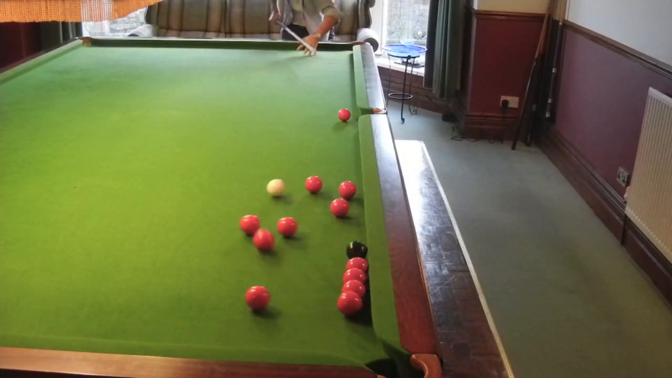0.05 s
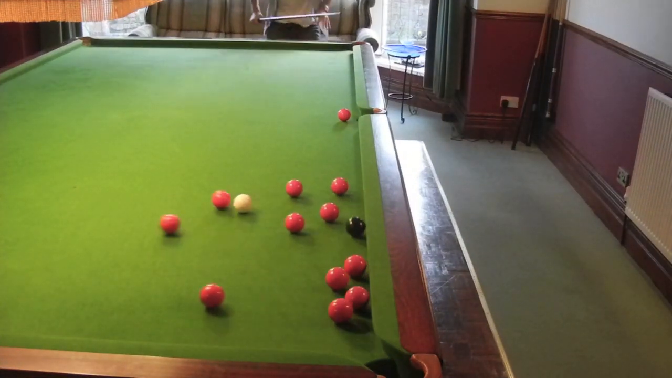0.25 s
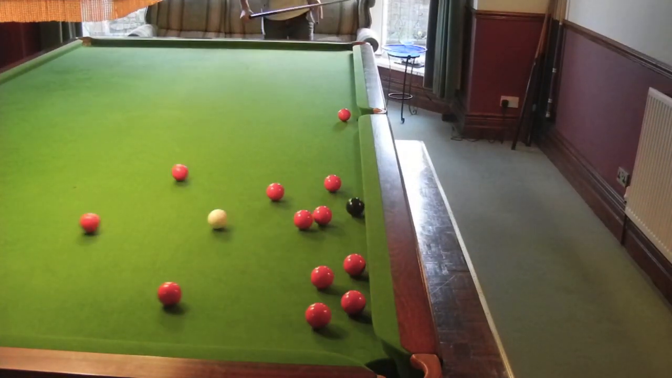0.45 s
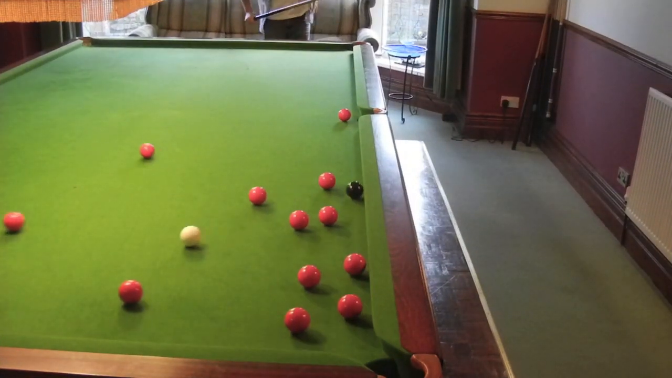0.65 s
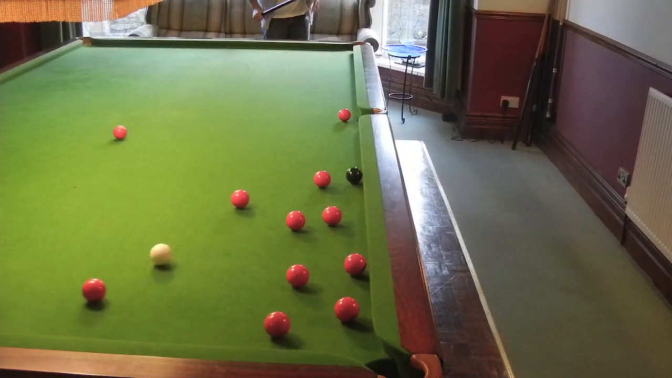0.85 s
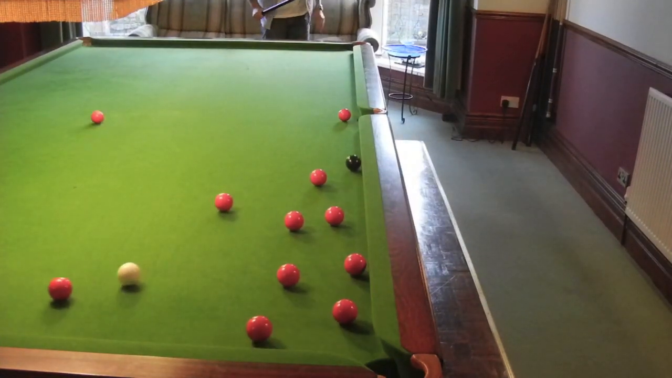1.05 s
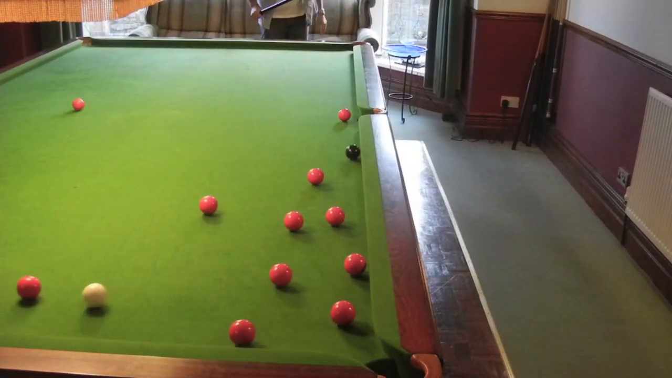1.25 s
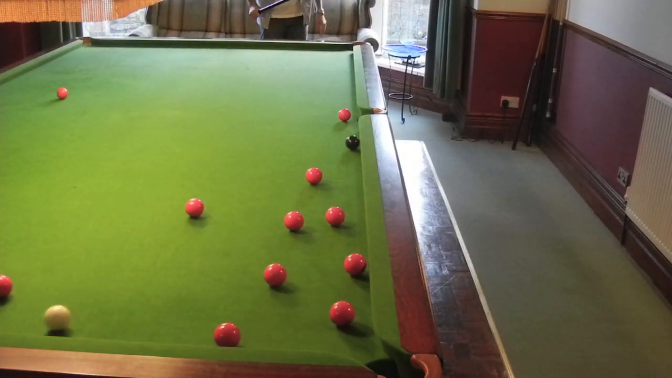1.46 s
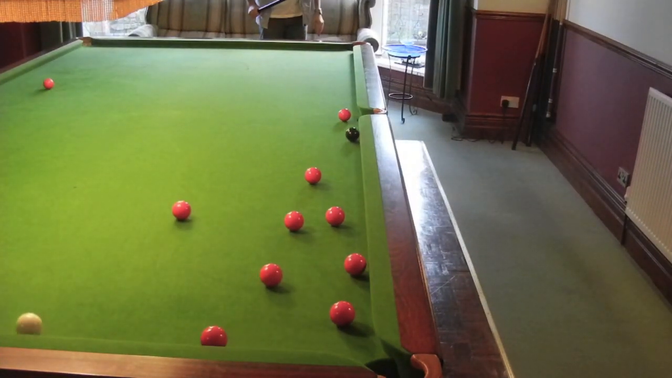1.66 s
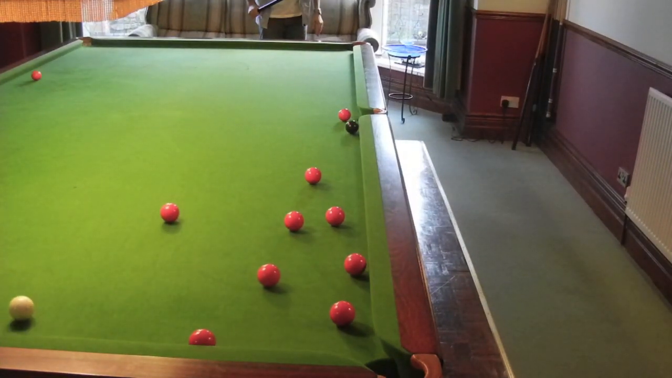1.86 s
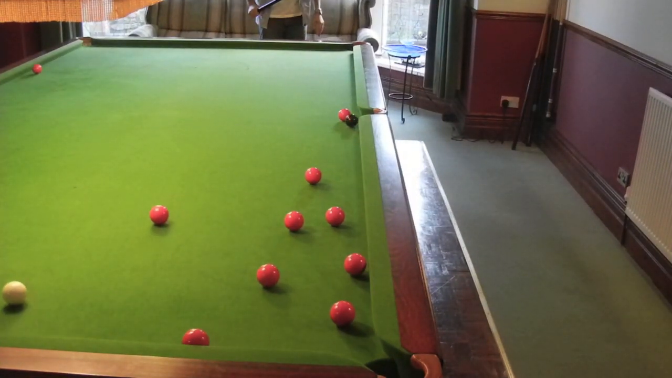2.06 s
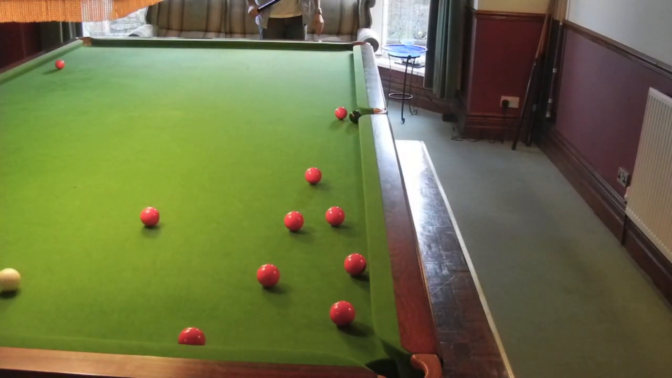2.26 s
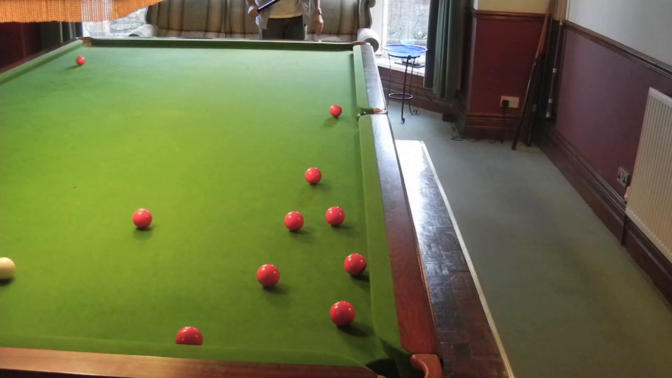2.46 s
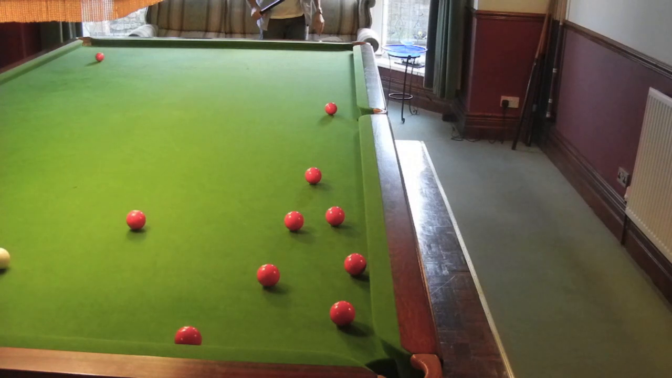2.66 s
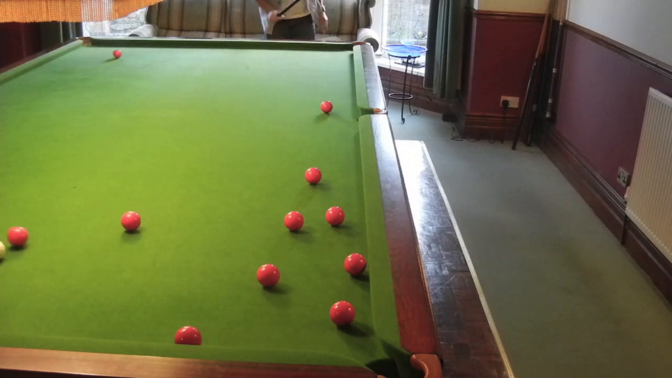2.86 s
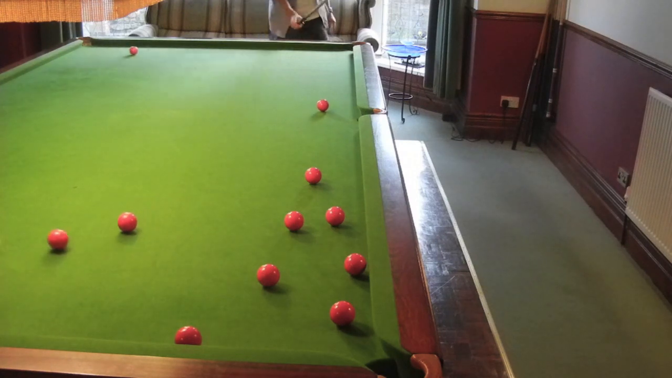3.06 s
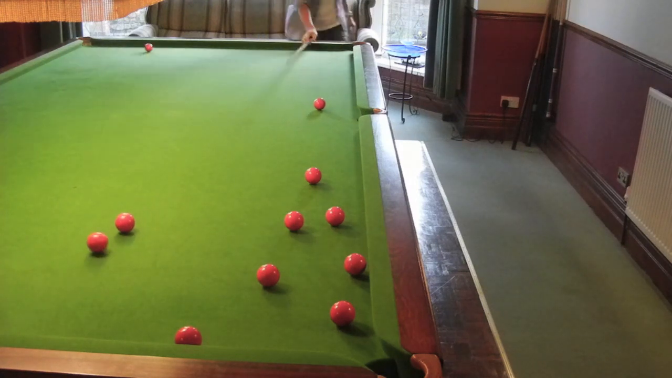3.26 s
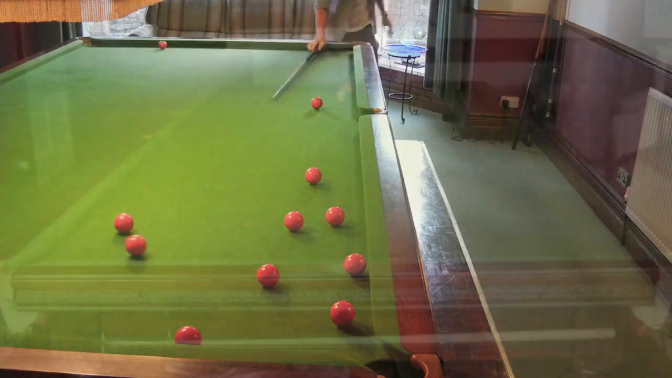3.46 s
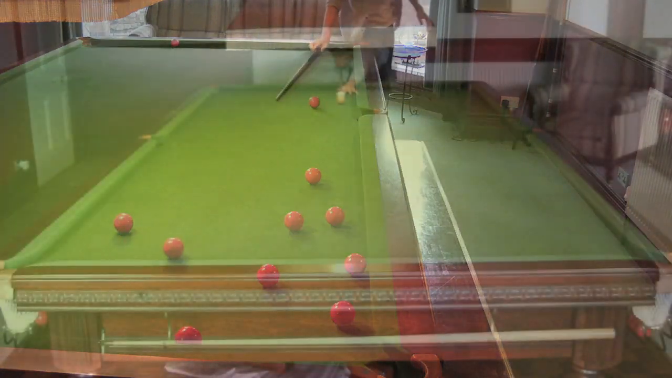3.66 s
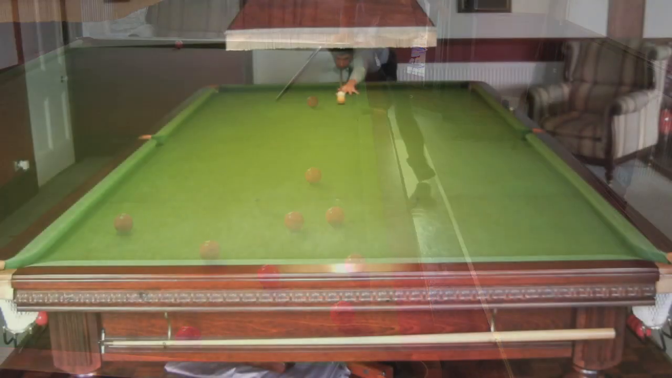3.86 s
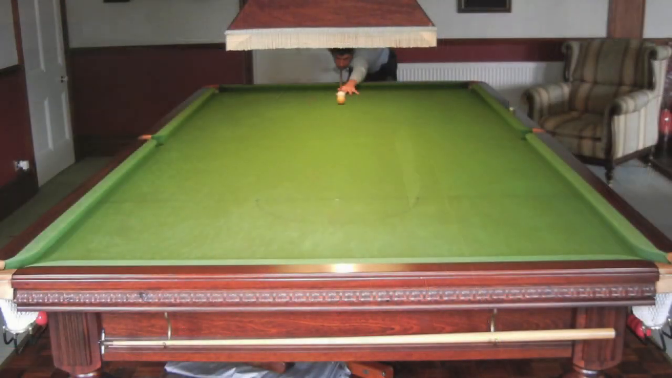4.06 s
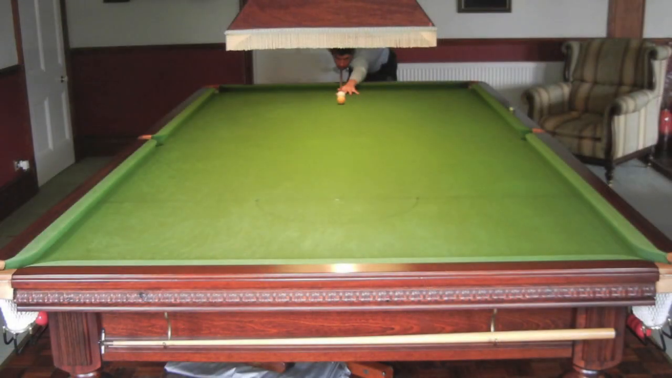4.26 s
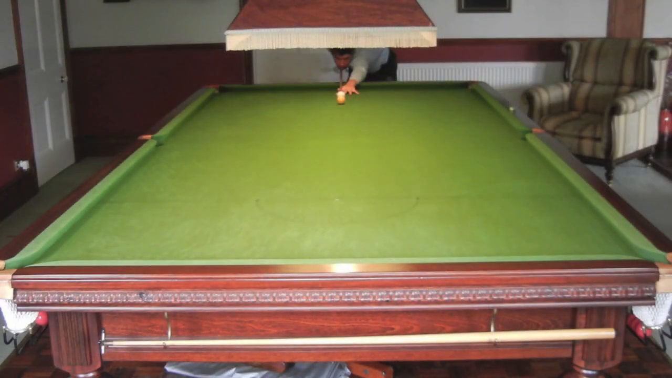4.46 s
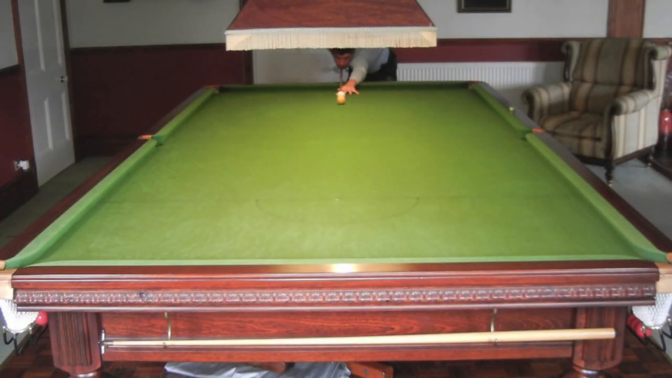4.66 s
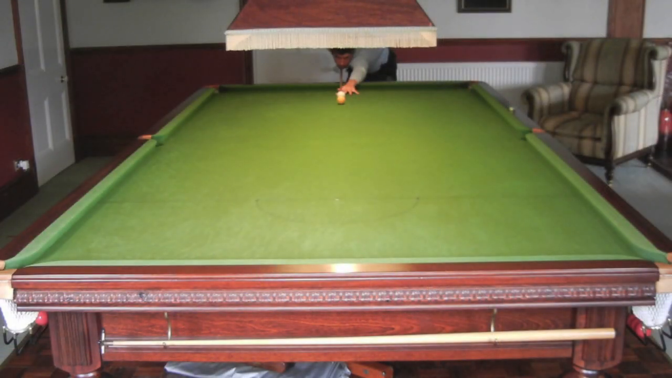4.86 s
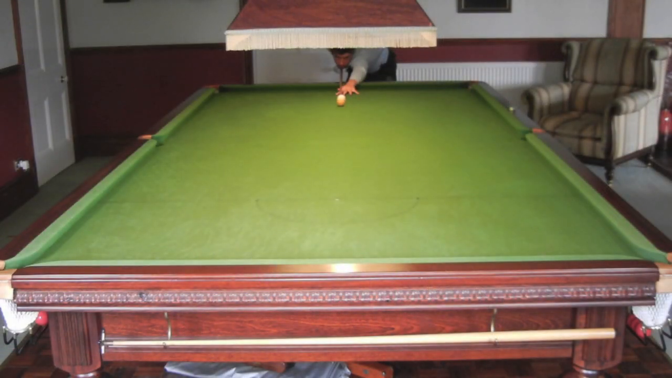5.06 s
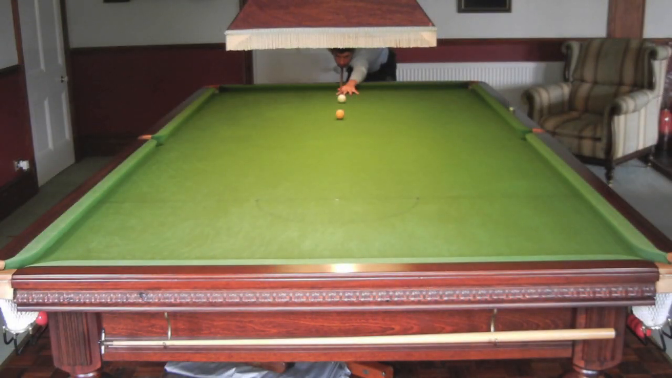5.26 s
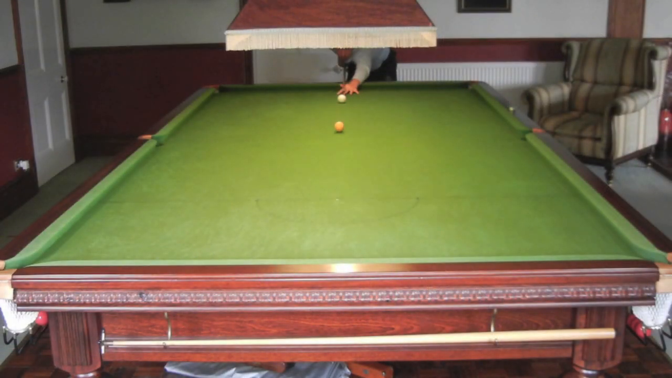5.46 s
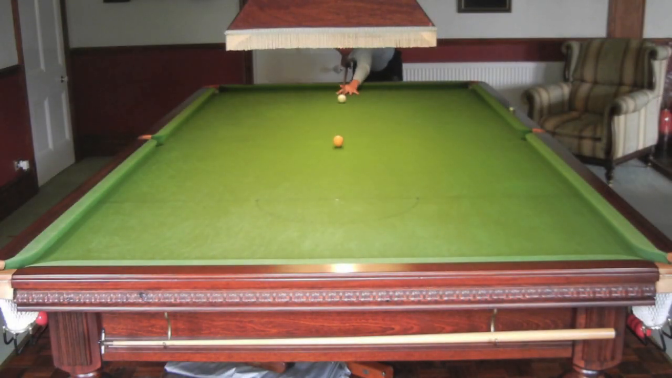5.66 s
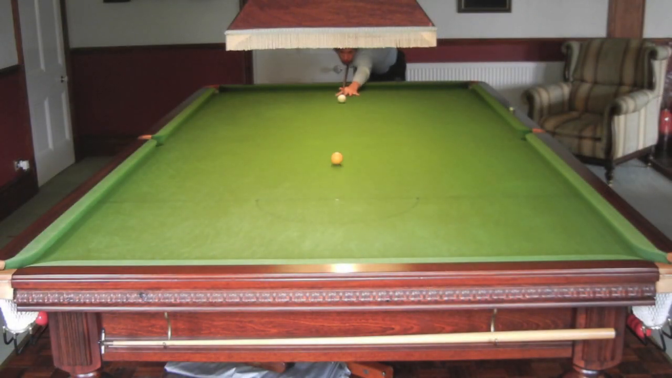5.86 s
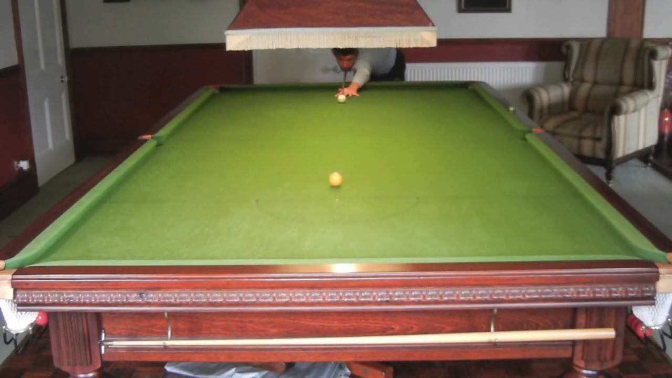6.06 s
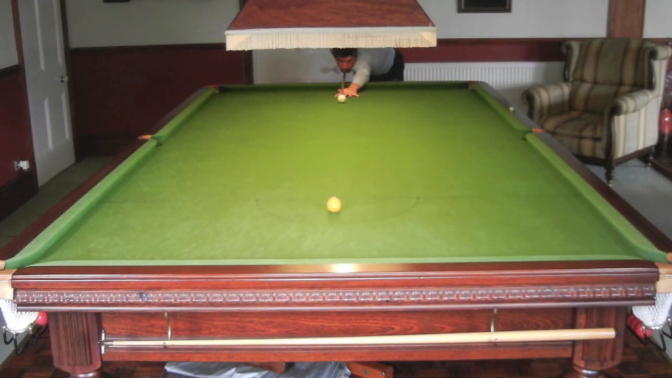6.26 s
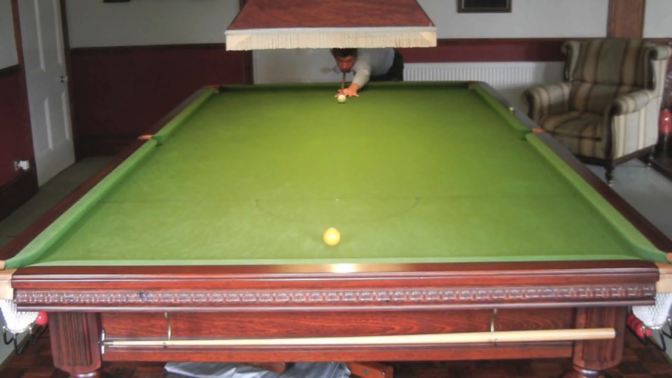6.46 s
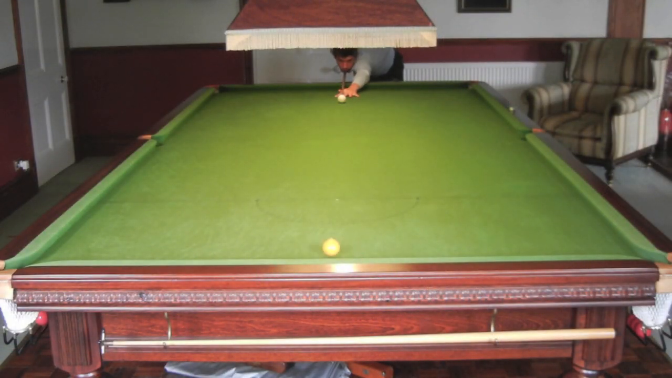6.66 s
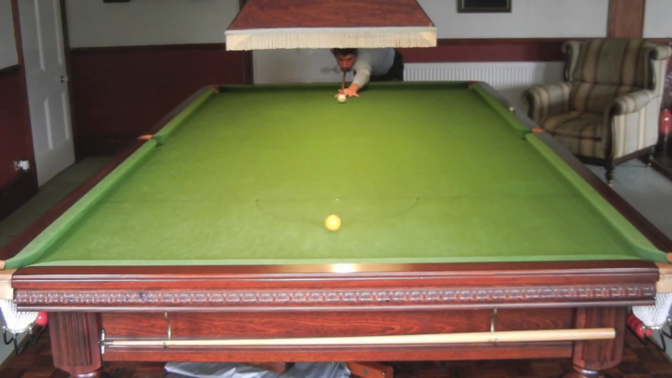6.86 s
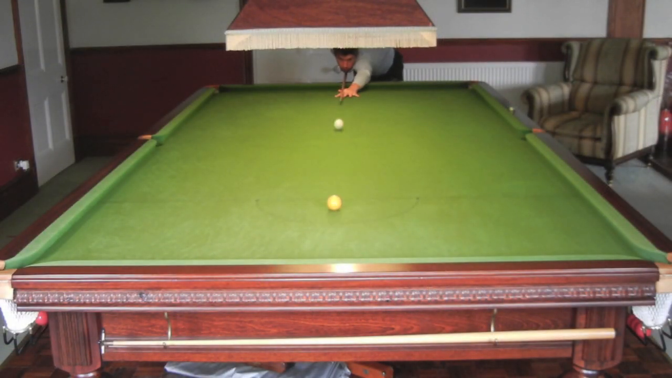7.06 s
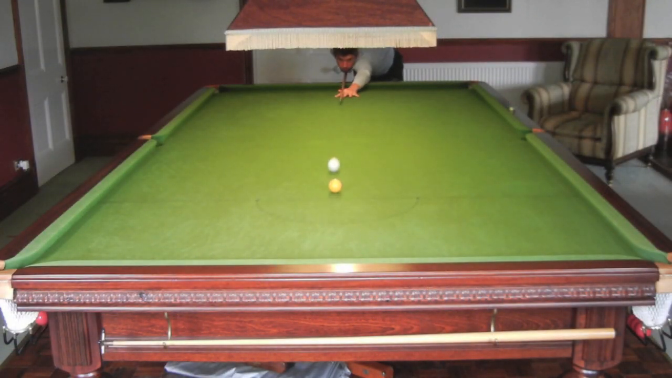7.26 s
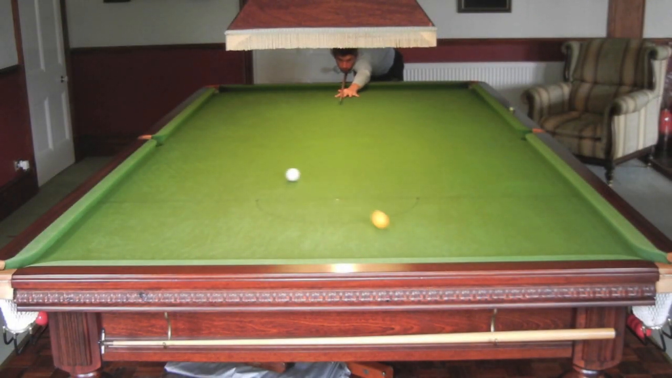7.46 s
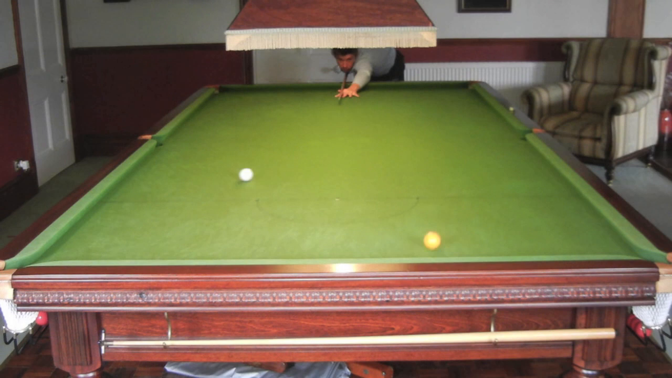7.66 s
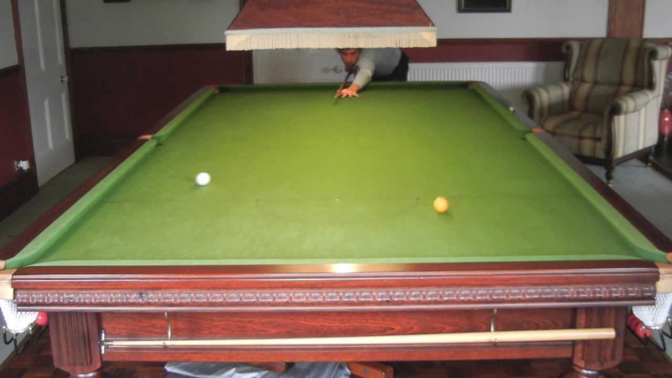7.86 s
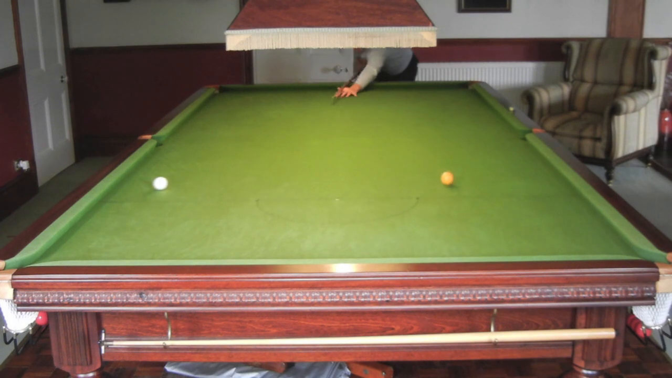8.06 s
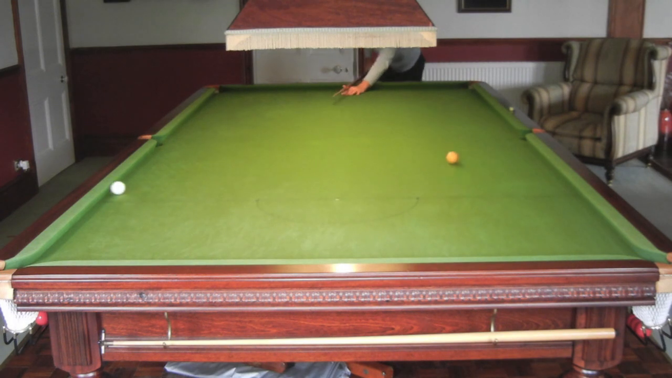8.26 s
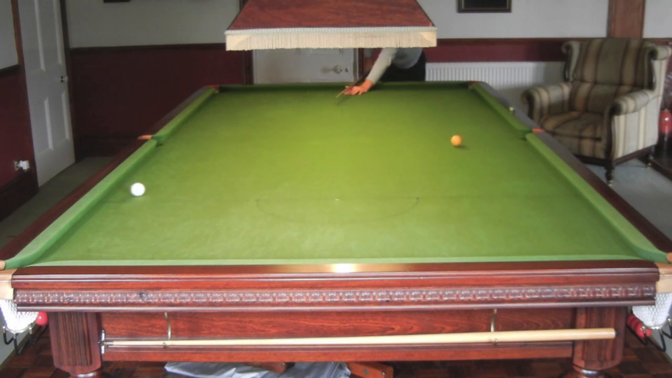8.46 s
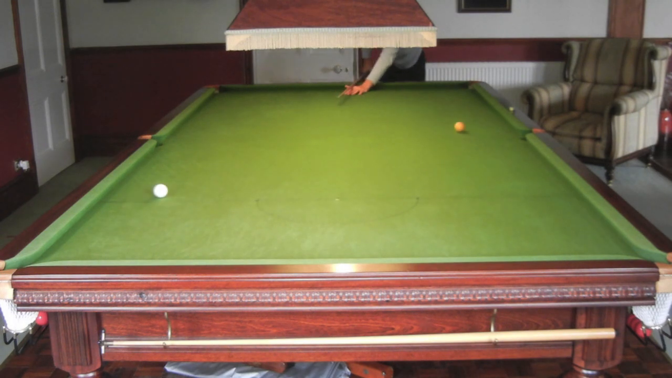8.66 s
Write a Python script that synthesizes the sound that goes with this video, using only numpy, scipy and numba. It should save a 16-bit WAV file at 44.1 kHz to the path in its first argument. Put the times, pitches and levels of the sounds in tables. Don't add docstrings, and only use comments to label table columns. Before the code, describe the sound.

A quiet, moderately live room with steady faint microphone hiss. At 0 s a snooker pack bursts open: loud, dry, high clicks tumble together until about 0.25 s, with a low cushion thud and rolling rumble beneath, then another click near 0.6 s. Balls roll softly; dull cushion bumps come at 1.6 and 2.1 s, and a clear single click at 2.3 s. Shoes scuff carpet at 2.7 and 3.0 s; a cue taps wood around 3.5 s as the first place blends into another. At 5.1 s a distant cue stroke cracks, woody and smeared by the room, with a ball click. The ball rolls quietly and bumps the cushion at 6.7 s. A harder, ringing stroke lands at 7.0 s, a loud echoing ball click at 7.4 s, cushion thuds at 7.7 s, then a muffled cue knock at 8.3 s and fading roll. The recording level dips after loud hits.

```python
import sys
import numpy as np
from scipy import signal
from scipy.fft import rfft, irfft, next_fast_len
from scipy.io import wavfile
from scipy.ndimage import uniform_filter1d
from numba import njit

SR = 44100
rng = np.random.default_rng(int(sys.argv[2]) if len(sys.argv) > 2 else 0)


def amplitude_ratio(level_db):
    exponent = np.asarray(level_db, float) / 20
    return 10 ** exponent


def dump(signal):
    limited = np.clip(np.atleast_2d(signal).T, -1, 1)
    pcm = np.round(limited * 32767).astype(np.int16)
    wavfile.write(sys.argv[1], SR, pcm)


N = 384552


def to_rms(x):
    return x / np.sqrt(np.mean(x ** 2) + 1e-20)


def to_peak(x):
    return x / np.max(np.abs(x))


def along(points, hz):
    point_hz, value = np.transpose(points)
    return np.interp(np.log(hz + 1), np.log(point_hz + 1), value)


def filtered(x, response):
    size = next_fast_len(x.shape[-1] + 4096)
    spectrum = rfft(x, size) * response(np.fft.rfftfreq(size, 1 / SR))
    return irfft(spectrum, size)[..., :x.shape[-1]]


def peaks(rows):
    def response(f):
        total = 0
        for k, (centre, width, db) in enumerate(rows):
            damping = 1j * f * width
            total = total + (-1) ** k * amplitude_ratio(db) * damping / (centre * centre - f * f + damping)
        return total
    return response


def stereo(pair, side):
    wide = filtered(pair[1], lambda hz: amplitude_ratio(along(side, hz)))
    return np.array([pair[0] + wide, pair[0] - wide])


def noise(spectrum, side):
    pair = filtered(rng.standard_normal((2, N)), lambda hz: amplitude_ratio(along(spectrum, hz)))
    return stereo(pair / np.std(pair[0]), side)


def ring(modes, t, lag):
    out = np.zeros(len(t))
    for hz, db, t60 in modes:
        wander = np.cumsum(rng.standard_normal(len(t))) * .008 + 2 * np.pi * rng.random()
        size = amplitude_ratio(db + rng.normal(0, 1.5) - 60 * t / t60)
        gather = 1 - np.exp(-t / (lag * (hz / 3000) ** 2 + 1e-4))
        out += size * gather * np.sin(2 * np.pi * hz * t + wander)
    return to_peak(out)


FADE = (3.54, 4.38)
# delay in seconds, level in dB.
EARLY = [(.0008, -3), (.0027, -3), (.0039, -5), (.0062, -7), (.0075, -9), (.015, -17)]
# frequency in Hz, decay time t60 in seconds.
ROOM = [(100, 1), (400, 0.59), (2000, 0.61), (4000, 0.57), (8000, 0.53), (15000, 0.19)]
# frequency in Hz, side over mid in dB.
WIDE = [(60, -7), (110, -20), (200, -14.5), (380, -27), (700, -11), (1290, -14.5), (2380, -16), (4400, -7),
        (8120, 3), (15000, 9)]
CURTAINED = .72
TAIL = 28000


def add(out, s, hit, room_db, echo_db, stretch=1):
    hz, t, z = signal.stft(rng.standard_normal((2, TAIL)), SR, nperseg=256)
    t60 = along(ROOM, hz)[:, None] * (CURTAINED if s < FADE[1] else 1)
    tail = signal.istft(z * amplitude_ratio(-60 * t / t60), SR, nperseg=256)[1][:, :TAIL]
    tail = tail * (1 - np.exp(-(np.arange(TAIL) / SR / 0.012) ** 2))
    answer = amplitude_ratio(room_db) * stereo(tail / np.linalg.norm(tail[0]), WIDE)
    answer[:, 0] += 1
    for delay, db in EARLY:
        echo = amplitude_ratio(db + echo_db + rng.normal(0, 1.0, 2)) * rng.choice([-1, 1])
        answer[:, round(delay * stretch * SR)] += echo
    start = round(s * SR)
    sound = signal.fftconvolve(hit[None], answer, axes=1)[:, max(-start, 0):]
    part = out[:, max(start, 0):][:, :sound.shape[1]]
    part += sound[:, :part.shape[1]]


def pulse(spectrum, size=1024):
    cepstrum = irfft(np.log(amplitude_ratio(spectrum(np.fft.rfftfreq(size, 1 / SR))) + 1e-6), size)
    fold = np.r_[1, np.full(size // 2 - 1, 2), 1, np.zeros(size // 2 - 1)]
    return to_peak(irfft(np.exp(rfft(cepstrum * fold)), size))


# frequency in Hz, level in dB per Hz.
CONTACT = [(150, -43), (300, -16.5), (600, -17.5), (1200, -7), (1800, 1), (2400, 5), (3000, 1),
           (3600, -6.5), (4200, -20), (5000, -34), (7000, -46.5), (12000, -78)]
# start in seconds, peak in dB,
# pitch factor, room in dB, echo spacing factor.
CLICKS = [(-.03, 12.5, 0.99, -20, 1.0), (0.079, 9, 1.04, -19.5, 0.92), (0.1088, -5.5, 0.956, -2, 0.92),
          (0.1452, 1, 0.93, -13, 0.9), (0.172, -6.5, 0.57, -14, 0.74), (0.186, -4.5, 0.83, -17, 0.85),
          (0.227, -6.5, 0.93, -3.5, 0.81), (0.33, -21.5, 0.9, 6, 0.88), (0.5652, -9, 0.87, -7.5, 0.7),
          (2.015, -52.5, 0.89, 16, 0.91), (2.279, -3, 0.86, -13.5, 0.91), (5.1494, 8, .95, -7, 0.52),
          (7.4369, 10, 1.015, -10.5, 1), (7.463, -3, 0.98, 5, 1)]
PACK_ENDS_S = .4
PACK_ECHO_DB, OPEN_ECHO_DB, LAMP_ECHO_DB = -4.5, -1.5, 10.5


def balls(out):
    for s, db, pitch, room_db, stretch in CLICKS:
        if s < PACK_ENDS_S:
            echo_db = PACK_ECHO_DB
        else:
            echo_db = OPEN_ECHO_DB if s < FADE[1] else LAMP_ECHO_DB
        click = pulse(lambda hz: along(CONTACT, hz / pitch))
        add(out, s, amplitude_ratio(db) * click, room_db + 12.5, echo_db, stretch)


# time in seconds, level in dB.
ROLL = [(0, -32.5), (.5, -41.5), (.9, -58), (1.2, -55), (2.5, -54), (3.2, -54.5), (3.9, -59.5), (4.3, -55),
        (4.8, -61.5), (5.5, -64), (5.7, -61), (5.85, -50.5), (6.05, -54), (6.6, -59), (7.5, -56),
        (8.1, -59), (8.4, -49), (8.72, -59)]
# frequency in Hz, level in dB per Hz.
RUMBLE = [(15, -59), (25, -28), (43, -2), (75, -2.5), (103, 0.5), (168, -9.5), (198, -5.5), (295, -17.5),
          (500, -11.5), (650, -44), (1100, -120)]
# frequency in Hz, level in dB per Hz.
CLOTH = [(180, -45), (300, -12), (492, -8), (743, -10.5), (974, -10.5), (1670, -9), (2710, -9.5),
         (5000, -34.5), (6500, -44), (11000, -120)]
# frequency in Hz, side over mid in dB.
ROLL_SIDE = [(60, -12), (110, -7), (200, -9), (380, -7), (700, -18), (1290, -5), (2380, -7.5), (4400, -14),
             (8120, -6), (15000, -2)]
# start in seconds, level in dB.
SHUDDERS = [
    (0.03, -48),
    (5.098, -44),
    (7.007, -30.5),
    (7.435, -38.5),
]
SHUDDER_T60_S = 2.24
RUMBLE_DB, RUMBLE_GROWS, ROLL_MID_DB = 1, 0.72, -53


def rolling():
    t = np.arange(N) / SR
    roll_db = np.interp(t, *np.transpose(ROLL))
    shudder = sum(amplitude_ratio(db - 60 * np.abs(t - s) / SHUDDER_T60_S) * (t > s) for s, db in SHUDDERS)
    slate = amplitude_ratio(ROLL_MID_DB + RUMBLE_DB + RUMBLE_GROWS * (roll_db - ROLL_MID_DB)) + shudder
    return slate * noise(RUMBLE, ROLL_SIDE) + amplitude_ratio(roll_db) * noise(CLOTH, ROLL_SIDE)


# frequency in Hz, level in dB per Hz.
HISS = [
    [(180, -52), (300, -5), (502, -11.5), (555, -5.5), (814, -9.5), (1010, -9.5), (1460, -13),
     (2440, -18.5), (2840, -13.5), (4670, -19), (11300, -20.5), (16000, -21.5)],
    [(180, -36), (300, -0.5), (398, -10), (519, -7), (555, -18), (603, -2.5), (787, -6.5), (1040, -6.5),
     (2400, -9), (6200, -15.5), (9880, -15), (16000, -19.5)],
]
# frequency in Hz, side over mid in dB.
HISS_SIDE = [(60, 5), (110, -6), (200, -9), (380, 4), (700, -1.5), (1290, -2), (2380, 1), (4400, -1.5),
             (8120, -2), (15000, 0.5)]


def hiss():
    later = np.interp(np.arange(N) / SR, FADE, (0, 1))
    first = amplitude_ratio(-55.5) * (1 - later) * noise(HISS[0], HISS_SIDE)
    return first + amplitude_ratio(-55.0) * later * noise(HISS[1], HISS_SIDE)


# start in seconds, peak in dB, rail over bed in dB, knock in dB, bed pitch in Hz.
THUDS = [(0.037, -20.5, 0, -0.5, 193.6), (0.64, -45, 8, -3, 165), (1.637, -35, -11, -17, 166.2),
         (1.718, -45, -3.5, -14, 158), (2.132, -38.5, -1, -30, 161), (2.727, -40, -27, -14, 158),
         (3.019, -41.5, -9, -3, 164.7), (3.345, -49, -8, -7, 144), (3.415, -43.5, 7, -12, 148),
         (3.678, -44, 3, -6, 176), (3.735, -49.5, -16, -7, 152), (3.829, -57, -16, -17.5, 163),
         (6.705, -32.5, 11, -8, 174), (6.76, -37, 9, -33, 187), (7.711, -29, 2.5, -4, 197.4),
         (7.753, -27, 9.5, -25, 209.5), (8.412, -47.5, 0, -17, 196.6), (8.541, -53, -14, -14, 196)]
# multiple of the bed pitch, width in Hz, level in dB.
BED = [(.62, 43, -10.5), (0.998, 10.1, 7), (1.22, 19, -4)]
# frequency in Hz, width in Hz, level in dB.
RAIL = [(374, 35.5, -1), (468, 76, -5.5), (554, 107, -8)]
# frequency in Hz, width in Hz, level in dB.
KNOCK = [(700, 36, 8), (1136, 710, 9), (2140, 950, 9)]


def cushions(out):
    t = np.arange(SR // 2) / SR
    push = (t / 0.00059) * np.exp(-t / 0.0009)
    for s, db, lean_db, knock_db, hz in THUDS:
        bed_db, rail_db = -max(lean_db, 0), min(lean_db, 0)
        swell = (t / .003) ** 2 / (1 + (t / 0.0046) ** 2) * np.exp(-t / 0.013)
        rough = rng.standard_normal(len(t)) * swell
        rough = to_peak(filtered(rough, lambda f: 1 / (1 + 1j * f / 2500) ** 2))
        bed_rows = [(multiple * hz, width, level) for multiple, width, level in BED]
        bed = amplitude_ratio(bed_db) * to_peak(filtered(push + 0.11 * rough, peaks(bed_rows)))
        rail = amplitude_ratio(rail_db) * to_peak(filtered(push + 0.3 * rough, peaks(RAIL)))
        knock = amplitude_ratio(knock_db) * to_peak(filtered(rough, peaks(KNOCK)))
        add(out, s - .003, amplitude_ratio(db + 0.5) * (bed + rail + knock), room_db=6.0, echo_db=6.0)


# start in seconds, peak in dB, decay time t60 in seconds.
SCUFFS = [
    (2.7266, -28.5, 0.2),
    (2.7738, -36, 0.47),
    (2.9813, -23, 0.18),
    (3.731, -34.5, 0.2),
]
# frequency in Hz, level in dB per Hz.
SOLE = [(180, -42), (300, -6.5), (571, -1.5), (1120, -10.5), (1260, -6), (2280, -5.5), (6050, -19),
        (10300, -19), (15500, -25)]


def shoes(out):
    t = np.arange(SR // 4) / SR
    for s, db, t60 in SCUFFS:
        rub = to_rms(filtered(rng.standard_normal(len(t)), lambda hz: amplitude_ratio(along(SOLE, hz))))
        envelope = amplitude_ratio(db - 11 - 60 * t / t60) * (1 - np.exp(-t / 0.001))
        add(out, s - .004, envelope * rub, room_db=-1.0, echo_db=2.5)


# start in seconds, peak in dB, brightness in dB, place 0 or 1.
TAPS = [
    (3.442, -31, -7, 0),
    (3.542, -19.5, -2, 0),
    (8.153, -33, -14, 1),
    (8.302, -21, -19, 1),
]
# frequency in Hz, level in dB, t60 in seconds.
BUTT = [
    [(411, -5.5, 0.086), (532, -1, 0.045), (700, -3, 0.04), (880, -16, 0.044), (1076, -9, 0.056)],
    [(391, -20, 0.47), (441, 2, 0.094), (493, 7, 0.11), (713, -9.5, 0.42), (1095, -13.5, 0.19),
     (1490, -50, 0.1)],
]
# frequency in Hz, level in dB, t60 in seconds.
SHAFT = [(1390, -4, .09), (1570, 0, .05), (1880, -3, .08), (2260, -1, .07), (2600, -6, .05),
         (2800, -7, .06), (3300, -8, .05), (3750, -7, .04), (4900, -14, .04), (5500, -14, .04)]


def laid_cue(out):
    t = np.arange(SR // 2) / SR
    broad = peaks([(1900, 2600, 0)])
    for s, db, bright_db, place in TAPS:
        burst = rng.standard_normal(len(t)) * np.exp(-t / 0.017)
        knock = to_peak(filtered(burst, lambda hz: broad(hz) ** 2 / (1 + (hz / 4500) ** 4)))
        low = ring(BUTT[round(place)], t, lag=0.0026)
        high = ring(SHAFT, t, lag=0.012) + 0.75 * knock
        wood = low + amplitude_ratio(bright_db + 3) * high
        add(out, s - .006, amplitude_ratio(db + 1) * wood * (1 - np.exp(-(t / 0.007) ** 2)), room_db=-6, echo_db=-10)


# start in seconds, peak in dB, spread in seconds, rise in seconds, ring in dB.
STROKES = [
    (5.0979, -1, 0.044, 0.017, -3),
    (7.0064, 3, 0.057, 0.0017, -5),
]
# frequency in Hz, level in dB, t60 in seconds.
STROKE_MODES = [
    [(450, -3, .12), (716, -3, .07), (1050, -4, .15), (1380, -12, .2), (1561, -10, .15), (1870, -4, .2),
     (2230, -6, .2), (2760, -12, .18), (3214, -3, .2), (3700, -8, .15), (4883, -12, .1)],
    [(490, -4, .3), (590, -7, .15), (831, -9, .2), (1044, -5, .19), (1385, -7, .23), (1650, -3, .15),
     (1885, -6, .3), (2187, -6, .2), (2610, -8, .3), (2770, -9, .18), (3187, -2, .45), (3285, -4, .45),
     (3685, -11, .3), (4356, -13, .28), (4797, -13, .3), (5308, -20, .2), (5997, -21, .16),
     (6465, -23, .25), (7940, -29, .2)],
]
# frequency in Hz, level in dB per Hz.
STROKE_NOISE = [
    [(59, -29), (100, -1.5), (718, -2), (1700, -5.5), (1880, -3), (2990, -6.5), (3250, -33), (3460, -6),
     (3760, -10), (15000, -53)],
    [(59, -54), (100, -29), (400, -13.5), (814, -19.5), (1070, -16.5), (1260, -21), (2750, -17.5),
     (2990, -23), (3600, -21.5), (15000, -59)],
]


def strokes(out):
    t = np.arange(SR // 2) / SR
    for (s, db, spread, rise, ring_db), modes, colour in zip(STROKES, STROKE_MODES, STROKE_NOISE):
        burst = filtered(rng.standard_normal(len(t)), lambda hz: amplitude_ratio(along(colour, hz)))
        burst = burst * np.exp(-t / spread)
        low = filtered(burst, lambda hz: 1 / (1 + (hz / 3000) ** 4))
        by_walls = (1 - np.exp(-t / 0.023)) * np.exp(-t / 0.082) * 1.73
        burst = low + (burst - low) * by_walls
        swell = (1 - np.exp(-t / 0.00023)) * (1 - 0.44 * np.exp(-t / rise))
        hit = (to_peak(burst) + amplitude_ratio(ring_db) * ring(modes, t, lag=.006)) * swell
        add(out, s, amplitude_ratio(db - 2) * hit, room_db=-15.5, echo_db=-9)


def placed(source):
    track = np.zeros((2, N))
    source(track)
    return track


def scene():
    out = rolling() + hiss()
    for source in (balls, cushions, shoes, laid_cue, strokes):
        out = out + placed(source)
    return out


@njit
def follow(level, rise, fall):
    env, e = np.empty_like(level), 0.0
    for i in range(len(level)):
        e += (rise if level[i] > e else fall) * (level[i] - e)
        env[i] = e
    return env


def smear(x, mid_db, side_db):
    z = signal.stft(np.array([x[0] + x[1], x[0] - x[1]]) / 2, nperseg=2048)[2]
    level = amplitude_ratio(mid_db) * np.abs(z) + amplitude_ratio(side_db) * np.abs(z[::-1])
    level = uniform_filter1d(level, size=9, axis=1)
    random_phase = np.exp(2j * np.pi * rng.random(z.shape))
    mid, side = signal.istft(level * random_phase, nperseg=2048)[1][:, :N]
    return x + np.array([mid + side, mid - side])


def band_limit(x):
    return signal.sosfilt(signal.butter(12, 16660, fs=SR, output="sos"), x)


def record(dry):
    x = dry * amplitude_ratio([[-.5], [.5]])
    x = filtered(x, lambda hz: 1 - 0.48 * peaks([(295, 90, 0)])(hz))
    env = follow(np.max(np.abs(x), axis=0), 1 / (0.0006 * SR), 1 / (.14 * SR))
    x = x * (1 + (env / amplitude_ratio(-6.0)) ** 2) ** -.37
    x = x / (1 + np.abs(x / .8) ** 8) ** (1 / 8)
    x = smear(x, mid_db=-10, side_db=-20)
    mix = filtered(x, lambda hz: (1j * hz / (55 + 1j * hz)) ** 3 * (hz < 16600))
    return band_limit(mix)


dry = scene()
out = record(dry)
dump(out)
```